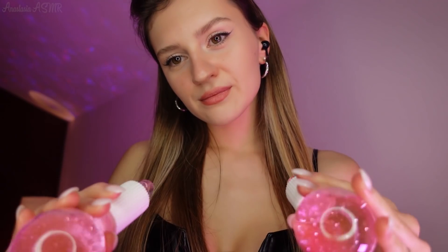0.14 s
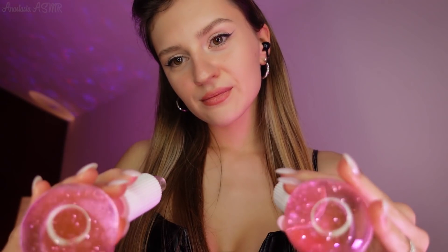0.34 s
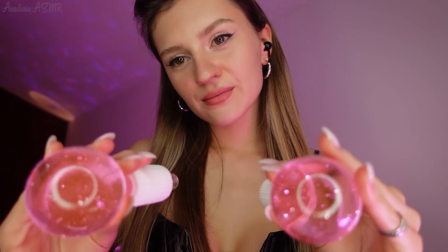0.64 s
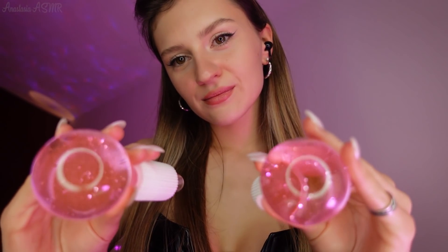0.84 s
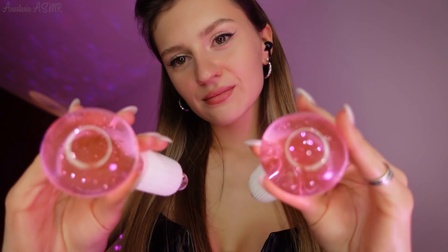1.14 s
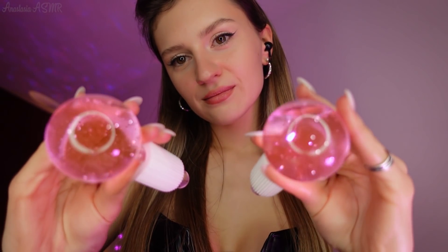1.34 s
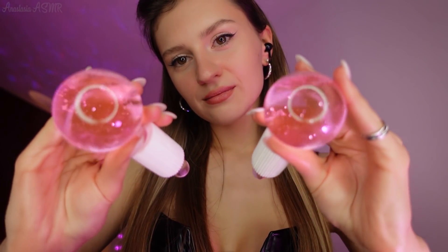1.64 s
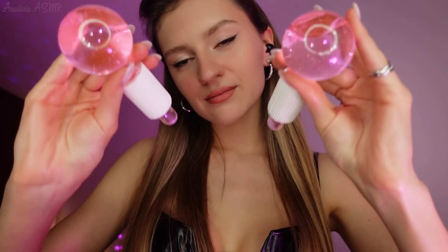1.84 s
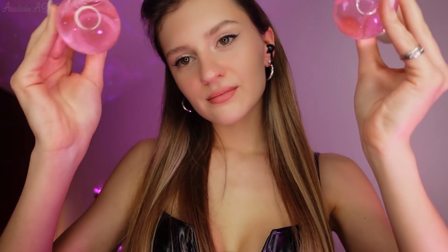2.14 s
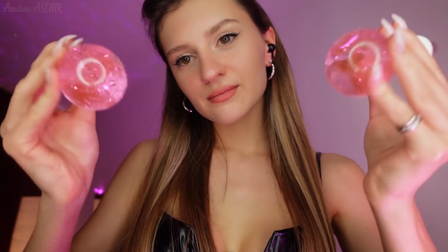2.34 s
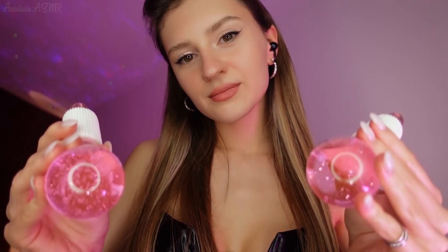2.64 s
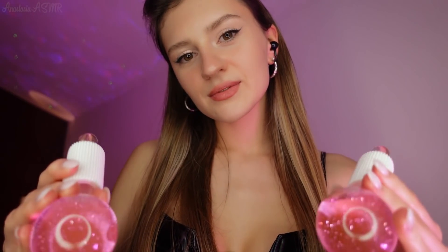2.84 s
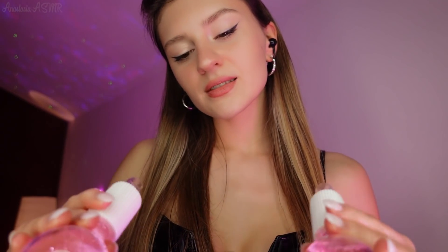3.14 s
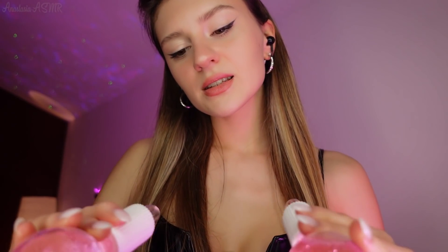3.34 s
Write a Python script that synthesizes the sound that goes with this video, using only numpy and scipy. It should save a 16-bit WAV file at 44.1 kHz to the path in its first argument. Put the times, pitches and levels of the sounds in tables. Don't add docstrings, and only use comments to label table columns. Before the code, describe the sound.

Liquid glugs and plinks inside small glass flasks turned close by, with sharp glassy ticks.

```python
import sys
import numpy as np
from scipy import signal
from scipy.fft import rfft, irfft, next_fast_len
from scipy.io import wavfile
from scipy.ndimage import map_coordinates

SR = 44100
rng = np.random.default_rng(int(sys.argv[2]) if len(sys.argv) > 2 else 0)


def attenuation_scalar(level_db):
    decades = np.asarray(level_db, float) / 20
    return 10 ** decades


def transcribe(signal):
    frames = np.atleast_2d(signal).T
    limited = np.clip(frames, -1, 1)
    pcm = np.round(limited * 32767).astype(np.int16)
    wavfile.write(sys.argv[1], SR, pcm)


N = 154350
TIME = np.arange(N) / SR
STEADY_TOP_HZ = 15950
TICK_CYCLES = 8

# (time [s], level [dB])
RUB_LEVEL = [(0, -61.5), (.14, -69.5), (.3, -64), (.42, -73), (.6, -63.5), (.8, -71.5), (1.75, -73),
             (1.93, -62), (2.08, -66), (2.5, -64), (2.62, -81), (2.9, -70), (3, -64), (3.12, -75),
             (3.5, -66)]


def unit(x):
    return x / np.sqrt(np.mean(x ** 2) + 1e-20)


def along(points, hz):
    f, v = np.transpose(points)
    return np.interp(np.log(hz + 1), np.log(f + 1), v)


def wobble(rate_hz):
    knots = rng.standard_normal(int(N * rate_hz / SR) + 4)
    return map_coordinates(knots, [TIME * rate_hz])


def filtered(x, response):
    m = next_fast_len(N + SR // 2)
    return irfft(rfft(x, m) * response(np.fft.rfftfreq(m, 1 / SR)), m)[..., :N]


def below_steady_top(hz):
    return hz < STEADY_TOP_HZ


def rush(spectrum):
    # (frequency [Hz], left-right likeness [0-1])
    likeness = [(30, 0.9977), (90, 0.97), (200, 0.91), (2000, 0.023), (10000, 0.014)]

    def mid_side(hz):
        angle = np.arccos(np.clip(along(likeness, hz), 0, 1)) / 2
        return attenuation_scalar(along(spectrum, hz)) * below_steady_top(hz) * np.array([np.cos(angle), np.sin(angle)])

    mid, side = filtered(rng.standard_normal((2, N)), mid_side)
    return unit(np.array([mid + side, mid - side]))


def add(track, s, wave, pan_db):
    far_lag_s, full_side_db = .00013, 8
    for side, sign in enumerate((1, -1)):
        lag_s = far_lag_s * np.clip(-sign * pan_db / full_side_db, 0, 1)
        part = track[side, round((s + lag_s) * SR):][:len(wave)]
        part += attenuation_scalar(sign * pan_db / 2) * wave[:len(part)]


def bubble(hz, t60_s, sweep, attack_s, length_s, bend=1):
    t = np.arange(int(length_s * SR)) / SR
    ring = np.sin(2 * np.pi * hz * np.cumsum(sweep(t)) / SR)
    return ring * attenuation_scalar(-60 * (t / t60_s) ** bend) * (1 - np.exp(-t / attack_s))


def tick(hz, cycles, grit):
    grit_db = -15
    t = np.arange(len(grit)) / SR
    shape = np.sin(np.pi * np.clip(t * hz / cycles, 0, 1)) ** 2
    return shape * (np.sin(2 * np.pi * hz * t) + attenuation_scalar(grit_db) * np.diff(grit, 2, prepend=[0, 0]))


def glugs():
    # (time [s], start pitch [Hz], time to surface [s], peak level [dB], t60 [s])
    pockets = [(1.319, 207.8, 0.16, -28.5, 0.2), (1.319, 451, 0.034, -38, 0.068),
               (1.365, 149.6, 0.28, -36.5, 0.28), (1.365, 490, 0.035, -28.5, 0.017),
               (1.495, 189, 0.24, -31.5, 0.22), (1.495, 417, 0.057, -39, 0.23),
               (1.609, 333.7, 0.2, -27, 0.13), (1.609, 436.7, .062, -44.5, 0.7),
               (2.862, 149, 0.34, -45.5, 0.077), (2.91, 193, 0.29, -53.5, 0.14),
               (2.675, 230, .4, -51, 0.075)]
    risers = [
        (2.514, 920, .018, -43, .12),
        (2.54, 1230, .045, -39, .06),
    ]
    attack_s, burst_s, longest_s, creep_per_s, pan_db = .0012, .003, .115, 5, 1.5
    out = np.zeros((2, N))
    for s, hz, surface_s, db, t60_s in [*pockets, *risers]:
        def climb(t):
            return np.exp(creep_per_s * t + (t / surface_s) ** 3)

        wave = bubble(hz, t60_s, climb, attack_s, min(.94 * surface_s, longest_s))
        left_s = np.arange(len(wave))[::-1] / SR
        burst = np.clip(left_s / (2 * burst_s), 0, 1)
        add(out, s, attenuation_scalar(db) * wave * burst, pan_db)
    return out


def plinks():
    # (time [s], pitch [Hz], peak level [dB], t60 [s], left over right [dB])
    drops = [(1.425, 1130, -35, 0.015, -5.5), (1.452, 1133, -51, .03, -1), (1.608, 3110, -52.5, 0.023, 8),
             (2.328, 2990, -38, 0.021, 6.5), (2.378, 872, -44, 0.026, 6), (2.377, 1598, -29, 0.024, 5.5),
             (2.377, 1820, -30, 0.019, 6), (2.378, 2115, -41.5, 0.021, 8), (2.447, 847, -31, 0.04, 1),
             (2.4477, 1209, -26, 0.018, 5), (2.447, 2577, -37.5, 0.029, -3.5),
             (2.4477, 3050, -32, 0.013, 8.5), (2.472, 980, -37, 0.02, 0), (2.506, 1213, -42.5, 0.023, 3),
             (2.513, 3044, -34, 0.01, 6.5), (2.54, 1820, -35, 0.0054, -11), (2.602, 3280, -40, 0.01, -23),
             (3.069, 317, -42, 0.018, 12.5)]
    attack_s, rise_per_s, fade_bend = .0007, 3, 1.8
    crack_db, crack_t60_s, crack_ratio = -16, 0.0016, 1.95
    out, t = np.zeros((2, N)), np.arange(SR // 100) / SR
    for s, hz, db, t60_s, pan_db in drops:
        ring = bubble(hz, t60_s, lambda t: 1 + rise_per_s * t, attack_s, t60_s, fade_bend)
        add(out, s, attenuation_scalar(db) * ring, pan_db)
        crack = np.cos(2 * np.pi * crack_ratio * hz * t)
        add(out, s, attenuation_scalar(db + crack_db - 60 * t / crack_t60_s) * crack, pan_db)
    return out


def clinks():
    # (time [s], pitch [Hz], peak level [dB], t60 [s], left over right [dB])
    knocks = [(1.4253, 3390, -28.5, 0.0096, -6.5), (1.4248, 4100, -30.5, 0.0048, -9.5),
              (1.4252, 9500, -35.5, 0.0095, -5), (1.4252, 7750, -41, .006, -4.5),
              (1.4252, 1900, -43, .005, -1), (1.4252, 13000, -39, .008, -5.5), (1.61, 1860, -53, .012, 7),
              (2.143, 6100, -32, 0.0032, 2), (2.329, 4600, -29, 0.003, 8.5), (2.360, 6600, -47, .003, -1),
              (2.368, 4570, -43, .004, 1), (2.368, 6440, -33, 0.0033, 10), (2.380, 2900, -40, 0.014, -3),
              (2.447, 14300, -24.5, 0.011, 3.5), (2.4481, 9760, -26, 0.0057, -3),
              (2.4477, 4000, -35.5, 0.0047, 12), (2.468, 2560, -44, 0.014, 11), (2.565, 2320, -43, .006, 8),
              (2.564, 1190, -50, 0.036, 8), (3.2054, 3220, -23, 0.0044, -1),
              (3.2065, 4270, -28, .002, -1.5), (2.8003, 3100, -26, 0.0026, 0.5),
              (2.8003, 4940, -26.5, 0.0026, 0), (2.8003, 9900, -43.5, 0.0061, -1),
              (2.8014, 14000, -27, .002, -2), (3.0690, 1150, -32, 0.017, 7.5)]
    attack_s = .0003
    out = np.zeros((2, N))
    for s, hz, db, t60_s, pan_db in knocks:
        add(out, s, attenuation_scalar(db) * bubble(hz, t60_s, np.ones_like, attack_s, t60_s), pan_db)
    return out


def slosh():
    # (time [s], level [dB])
    churn = [
        (2.36, -62),
        (2.4, -48.5),
        (2.56, -50.5),
        (2.66, -71),
    ]
    bubbles_per_s, centre_hz, spread, cycles, attack_s = 600, 1710, 0.34, 3.76, 0.00018
    out = np.zeros((2, N))
    s, db = np.transpose(churn)
    length_s = s[-1] - s[0]
    for when, pitch, size, pan in rng.random((200, 4))[:int(bubbles_per_s * length_s)]:
        at = s[0] + when * length_s
        hz = centre_hz * np.exp(spread * (4 * pitch - 2))
        life_s = 3 * cycles / hz
        ring = bubble(hz, life_s, lambda t: 1 + 0.086 * t / life_s, attack_s, life_s)
        add(out, at, attenuation_scalar(np.interp(at, s, db) - 2 * np.log(size)) * ring, 8 * pan - 3)
    return out


def nails():
    # (time [s], peak level [dB], pitch [Hz], left over right [dB])
    contact_ticks = [(0.12, -41, 13800, 13), (0.183, -30, 12300, 15), (0.2982, -45, 15700, -1.5),
                     (0.3101, -32.5, 13000, 17), (0.5085, -29, 14100, 15), (0.589, -37, 10100, 7.5),
                     (0.662, -41, 12500, 3), (0.6501, -30, 13100, -4.5), (0.8744, -37, 11300, 1),
                     (1.1199, -31, 11500, 7), (1.5942, -30.5, 11000, 11), (1.7619, -37.5, 10900, 10.5),
                     (2.144, -31, 10500, 0.5), (2.361, -35.5, 11900, 14), (2.4455, -26.5, 12900, -2.5),
                     (2.5097, -43.5, 10800, 19), (2.576, -32, 15000, 10), (3.206, -45, 11800, -18),
                     (3.236, -35, 13000, -1.5), (3.3717, -36.5, 13600, -8),
                     (0.0353, -36, 13600, 15), (0.0643, -36, 13900, -0.5), (0.0792, -39, 15500, 6.5),
             (0.2808, -53, 15200, -0.5), (0.3391, -37, 14300, 0), (0.3706, -43, 14000, 8),
             (0.5287, -46, 13600, -2.5), (0.5641, -44, 9800, 8), (0.6828, -46.5, 10200, -5),
             (0.7487, -47, 10900, 7), (0.9592, -47, 11100, 6.5), (1.0196, -46, 11000, 5.5),
             (1.0415, -46, 11500, 0.5), (1.0585, -41.5, 10800, 6), (1.1443, -39, 12100, 6),
             (1.4441, -29.5, 13500, -7.5), (1.4716, -43.5, 10800, -9), (1.6302, -44, 10900, 4),
             (1.925, -35, 11200, -1.5), (2.1116, -59, 11500, 3), (2.1484, -38.5, 10200, -6),
             (2.1724, -43, 11000, -2), (2.1899, -48, 11500, -3), (2.2228, -35, 14900, 5.5),
             (2.3131, -42, 15300, -2), (2.3674, -37, 12000, 5), (2.3775, -32, 12800, 6),
             (2.4653, -38, 13700, -2), (2.9163, -44, 12800, 7), (2.9771, -35, 15500, 5.5),
             (3.3448, -36, 12900, 5), (3.472, -50, 13400, 0.5)]
    # (time [s], peak level [dB], pitch [Hz], length [cycles], left over right [dB])
    snaps = [
        (2.4478, -25.5, 1360, 1.55, 2),
        (3.0688, -38.5, 1230, 1.57, 9),
    ]
    tick_db = -1.5
    out = np.zeros((2, N))
    for s, db, hz, pan_db in contact_ticks:
        add(out, s, attenuation_scalar(db + tick_db) * tick(hz, TICK_CYCLES, rng.standard_normal(64)), pan_db)
    for s, db, hz, cycles, pan_db in snaps:
        add(out, s, attenuation_scalar(db) * tick(hz, cycles, np.zeros(128)), pan_db)
    return out


def crackle():
    per_s, crackle_db, centre_hz, scatter_db = 114, 11.5, 11500, 2
    out, rub_db = np.zeros((2, N)), np.interp(TIME, *np.transpose(RUB_LEVEL))
    count = int(per_s * N / SR)
    draws, grits = rng.random((400, 4))[:count], rng.standard_normal((400, 64))
    for (when, pitch, size, pan), grit in zip(draws, grits):
        db = rub_db[int(when * N)] + crackle_db - scatter_db * np.log(size)
        wave = tick(centre_hz * (0.776 + .45 * pitch), TICK_CYCLES, grit)
        add(out, when * N / SR, attenuation_scalar(db) * wave, 16 * pan - 6)
    return filtered(out, below_steady_top)


def rub():
    # (frequency [Hz], density [dB per Hz])
    skin = [(3530, -42), (6000, -7.5), (11200, 1), (13800, 1), (15800, -2)]
    db = np.interp(TIME, *np.transpose(RUB_LEVEL)) - 0.5
    return attenuation_scalar(db + 1.5 * wobble(30) + 2 * wobble(120)) * rush(skin)


def grip_shifts():
    # (time [s], level [dB], attack [s], t60 [s])
    shifts = [
        (2.132, -51.5, 0.0024, 0.45),
        (2.271, -46.5, 0.073, 0.49),
        (2.354, -46.5, 0.0043, 0.095),
        (2.445, -60, 0.0098, 0.55),
    ]
    # (frequency [Hz], density [dB per Hz])
    cloth = [(530, -48.5), (900, -6), (3370, -2.5), (5570, -0.5), (10300, -3), (15800, -6.5)]
    envelope = np.zeros(N)
    for s, db, attack_s, t60_s in shifts:
        after_s = np.maximum(TIME - s, 0)
        envelope += attenuation_scalar(db - 60 * after_s / t60_s) * (1 - np.exp(-after_s / attack_s))
    return envelope * attenuation_scalar(2 * wobble(150)) * rush(cloth)


def room(x):
    # (frequency [Hz], t60 [s])
    decay = [(200, 0.12), (2000, 0.38), (12000, 0.077)]
    delay_s = .006
    hz, t, z = signal.stft(rng.standard_normal((2, SR // 2)), SR, nperseg=256)
    tail = signal.istft(z * attenuation_scalar(-60 * t / along(decay, hz)[:, None]), SR, nperseg=256)[1]
    late = np.pad(x.mean(0), (int(delay_s * SR), 0))[None]
    return signal.fftconvolve(late, tail / np.linalg.norm(tail[0]), axes=1)[:, :N]


def hum():
    # (frequency [Hz], level [dB])
    partials = [(50, -54.5), (100, -87.5), (150, -72), (1373, -84)]
    out = np.zeros(N)
    for hz, db in partials:
        level = attenuation_scalar(db + 1 + 2.27 * wobble(13))
        out += level * np.sin(2 * np.pi * hz * TIME + 0.51 * wobble(8.36))
    return out


def drone():
    # (time [s], half length [s])
    swells = [(0.43, 0.046), (1.077, 0.1), (1.878, 0.031), (2.05, 0.11), (2.503, 0.065), (3.066, 0.15),
              (3.353, 0.074)]
    drone_hz, drone_db, swell_db = 225.7, -65, 1.5
    gate = sum(np.exp(-((TIME - s) / half_s) ** 4) for s, half_s in swells)
    level = attenuation_scalar(drone_db + swell_db * wobble(8.1)) * gate
    return level * np.sin(2 * np.pi * drone_hz * TIME + 0.3 * wobble(29))


def whine():
    # (time [s], pitch [Hz], level [dB])
    paths = [
        [(2.82, 415, -75.5), (2.94, 377, -75)],
        [(3.08, 462, -68), (3.13, 481, -80), (3.22, 431, -73.5), (3.29, 496, -77.5), (3.36, 459, -74),
         (3.46, 386, -77)],
    ]
    fade_s, gain_db = 0.021, 8.5
    out = np.zeros(N)
    for path in paths:
        s, hz, db = np.transpose(path)
        fade = np.clip(np.minimum(TIME - s[0], s[-1] - TIME) / fade_s, 0, 1)
        phase = 2 * np.pi * np.cumsum(np.interp(TIME, s, hz)) / SR
        out += fade * attenuation_scalar(np.interp(TIME, s, db) + gain_db) * np.sin(phase)
    return out


def air_pressure():
    # (frequency [Hz], density [dB per Hz])
    air_colour = [(1.2, -120), (2.2, -6), (6, -2), (14, -18.5), (28, -31.5), (50, -41.5), (130, -120)]
    air_db, end_fade_s = -36.5, .08
    return attenuation_scalar(air_db) * rush(air_colour) * np.clip((TIME[-1] - TIME) / end_fade_s, .25, 1)


def murmur():
    # (frequency [Hz], density [dB per Hz])
    murmur_colour = [(32, -37), (55, 1.5), (107, -17), (337, -20.5), (438, -33), (636, -22.5), (1500, -45),
                     (1950, -63), (3300, -120)]
    return attenuation_scalar(-61.5 - 0.5 + 0.34 * wobble(6.9)) * rush(murmur_colour)


def hiss():
    # (frequency [Hz], density [dB per Hz])
    hiss_colour = [(470, -2), (800, -9), (2200, -5.5), (2890, -9), (3240, -8), (15800, -13)]
    return attenuation_scalar(-62.5 - 1.64) * rush(hiss_colour)


def scene():
    glug_wet_db, near_wet_db = -10.5, -16.5
    swirl_share, swirl_per_s = 1.1, 900
    low = glugs()
    near = plinks() + clinks() + slosh() + nails() + crackle() + rub() + grip_shifts()
    ruffled = filtered(room(near) * (1 + swirl_share * wobble(swirl_per_s)), below_steady_top)
    wet = attenuation_scalar(glug_wet_db) * room(low) + attenuation_scalar(near_wet_db) * ruffled
    background = hum() + drone() + whine() + air_pressure() + murmur() + hiss()
    return low + near + wet + background


def roll_off(x):
    return signal.sosfilt(signal.butter(12, 16990, fs=SR, output="sos"), x)


def record(dry):
    top_hz = 16900
    mix = filtered(dry, lambda hz: np.clip((top_hz - hz) / (top_hz - STEADY_TOP_HZ), 0, 1))
    return roll_off(mix)


dry = scene()
out = record(dry)
transcribe(out)
```